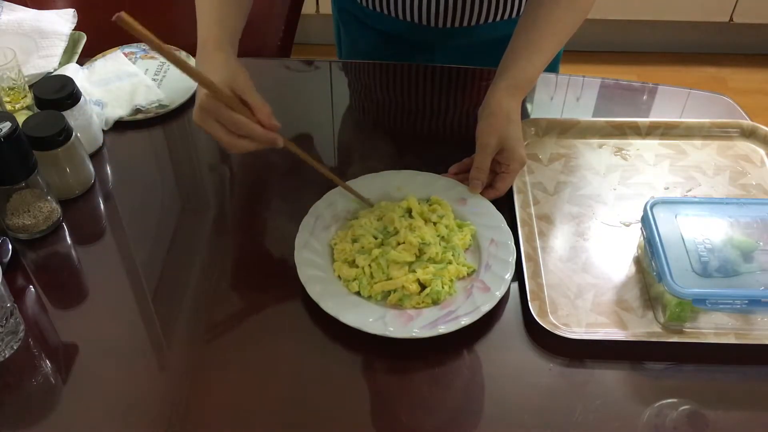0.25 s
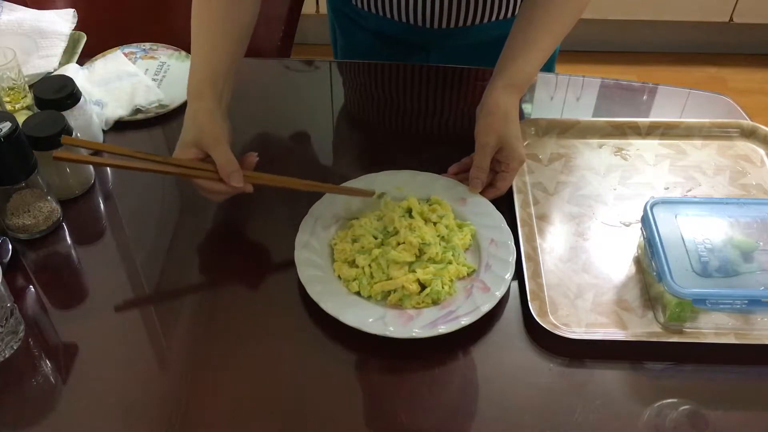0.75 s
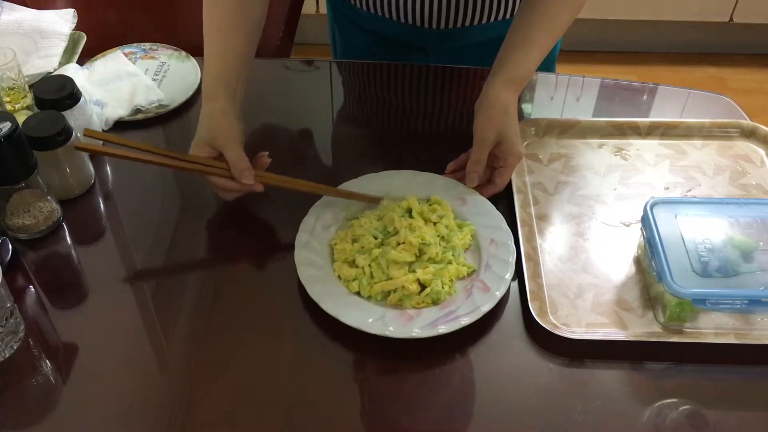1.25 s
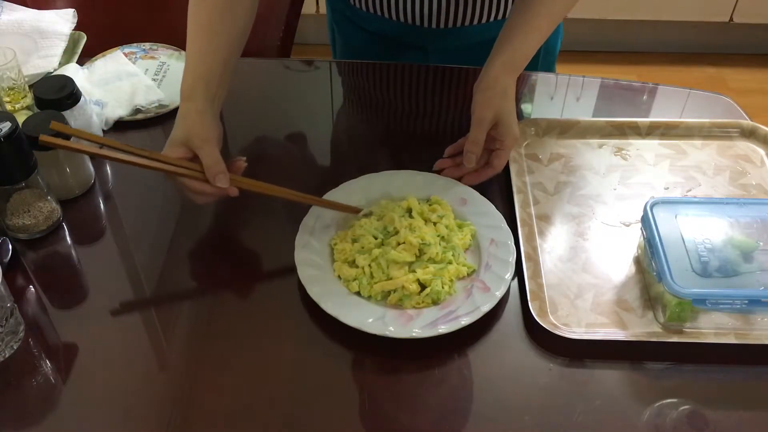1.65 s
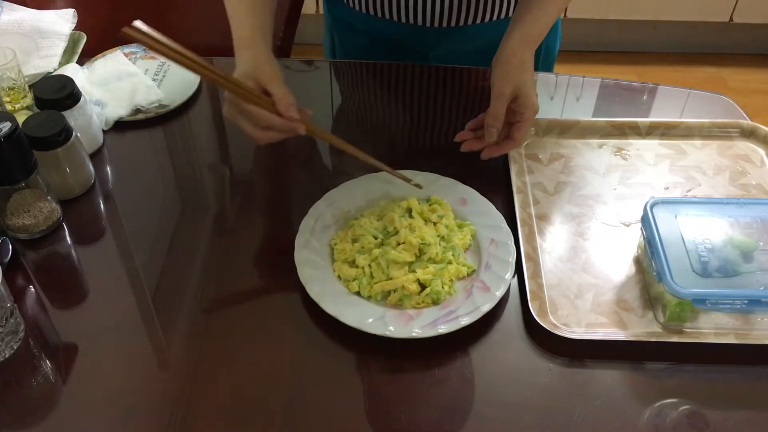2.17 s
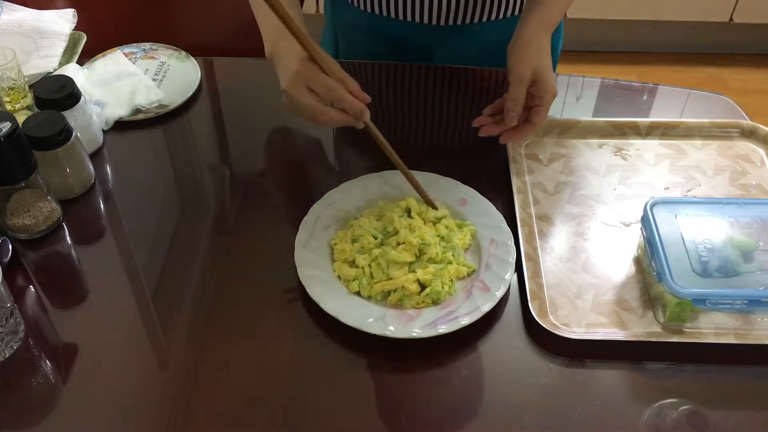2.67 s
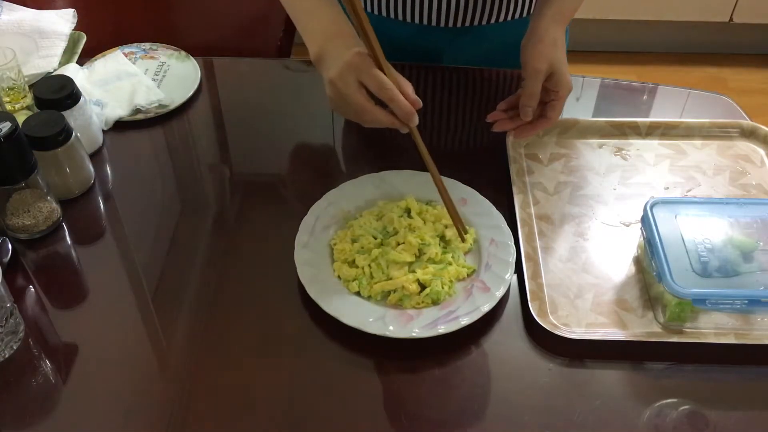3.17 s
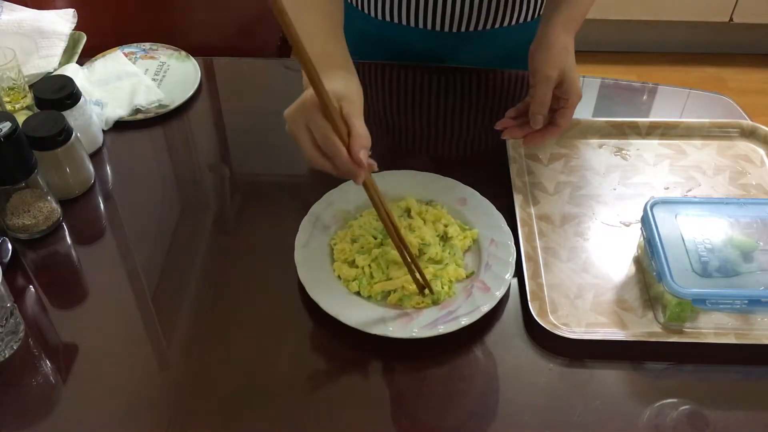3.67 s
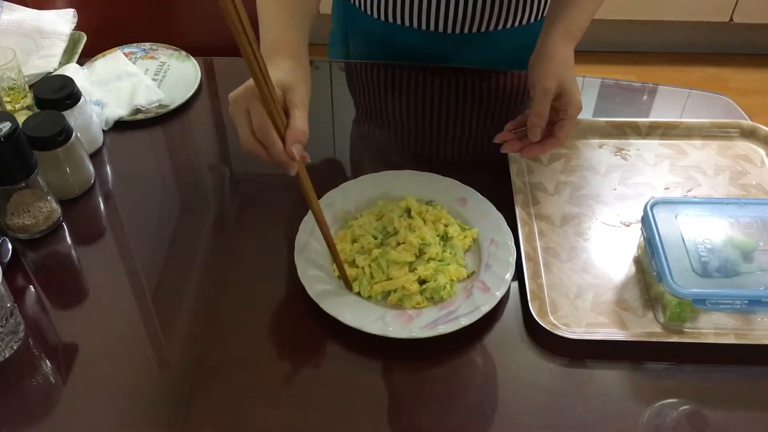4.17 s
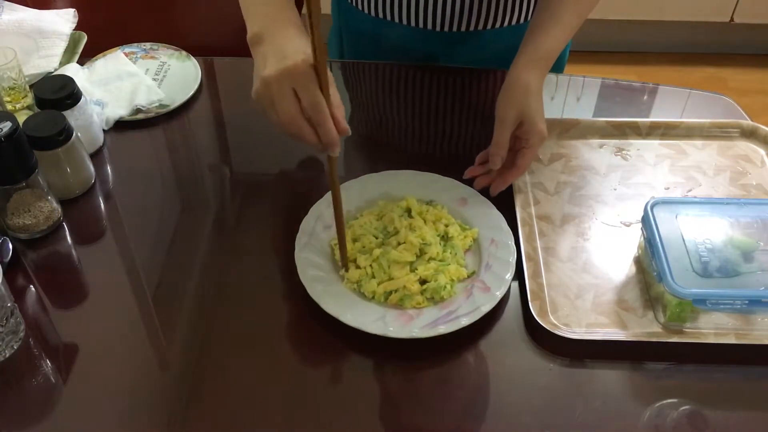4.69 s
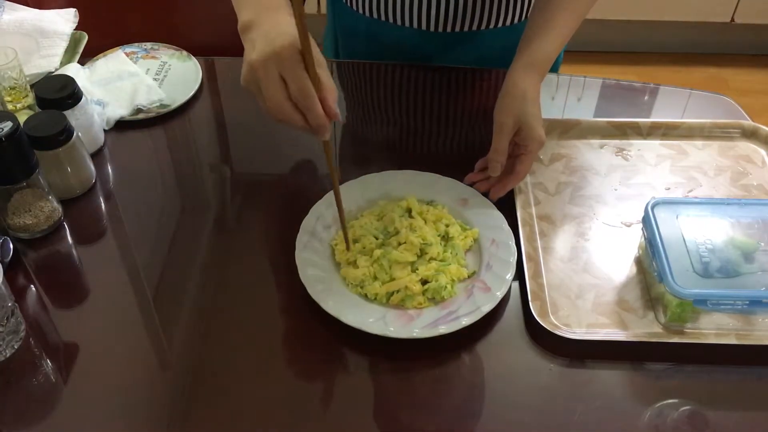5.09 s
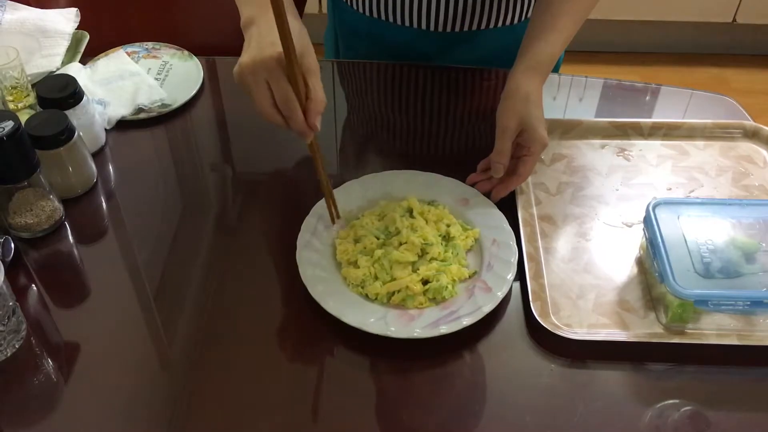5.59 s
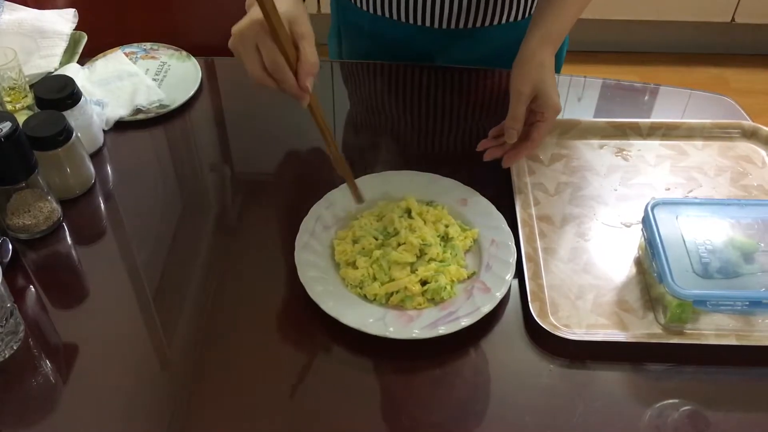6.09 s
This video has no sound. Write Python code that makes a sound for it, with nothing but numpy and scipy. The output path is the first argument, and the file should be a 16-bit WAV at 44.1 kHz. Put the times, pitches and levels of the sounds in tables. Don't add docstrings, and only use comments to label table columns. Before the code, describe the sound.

Wooden chopsticks tap a ceramic plate with sharp, briefly ringing clicks, while moist food ticks softly and a kitchen appliance hums.

```python
import sys
import numpy as np
from scipy import signal
from scipy.fft import rfft, irfft, next_fast_len
from scipy.io import wavfile
from scipy.ndimage import uniform_filter1d, minimum_filter1d

SR = 44100
rng = np.random.default_rng(int(sys.argv[2]) if len(sys.argv) > 2 else 0)


def voltage_ratio(level):
    return 10 ** (np.asarray(level, float) / 20)


def persist_wave(psi):
    counts = np.round(np.clip(psi, -1, 1) * 32767).astype(np.int16)
    wavfile.write(sys.argv[1], SR, np.atleast_2d(counts).T)


N = 279838


def unit(x):
    return x / np.sqrt(np.mean(x ** 2) + 1e-20)


def along(points, hz):
    f, v = np.transpose(points)
    return np.interp(np.log(hz + 1), np.log(f + 1), v)


def noise(response):
    m = next_fast_len(N)
    spectrum = rfft(rng.standard_normal(m)) * response(np.fft.rfftfreq(m, 1 / SR))
    return unit(irfft(spectrum, m)[:N])


# (time [s], strength [dB], hardness [flat of the stick -1 to bare tip 1],
# place [well -1 to rim 1], side [near -1 to far 1])
TAPS = [(0.245, -26, 0.78, -0.78, 0.46), (1.0275, -23, 0.027, -0.45, 0.15),
        (1.2682, -22.5, 0.66, 0.026, -0.51), (1.5474, -33, -0.34, 0.22, 0.31),
        (2.405, -23, 1, -0.49, -0.82), (2.7083, -27.5, -0.2, -0.26, -0.78), (3.0942, -27, -0.9, -.8, 0.18),
        (3.4407, -24.6, -.8, 0.67, -0.25), (3.4542, -28.5, 1.96, -0.051, 0.15),
        (3.4792, -44, 1, 0.24, -0.44), (3.8547, -28, -1.04, -0.72, 0.56), (4.2823, -37, -0.36, -0.4, 0.37),
        (4.648, -17.5, -0.57, 0.77, 0.047), (4.9295, -18, -0.31, 0.91, 0.6),
        (5.3554, -23.5, -0.79, -0.22, 0.18), (5.695, -23.5, -0.37, 0.76, -0.92),
        (5.9995, -23, 0.17, 0.41, -1.87), (6.3224, -42.5, 0.99, -0.94, .1)]


def ducking():
    start_db, threshold_db, duck_per_db = -6, -40, 0.26
    fall_s, hold_s, creep_db_per_s = 0.03, 0.067, 6
    hard_db = 5.2
    t = np.arange(N) / SR
    gain_db = np.minimum(0, start_db + creep_db_per_s * t)
    for s, db, hard, *_ in TAPS:
        depth_db = duck_per_db * (db + hard_db * hard - threshold_db)
        fall = -depth_db * np.clip((t - s) / fall_s, 0, 1)
        creep = creep_db_per_s * np.maximum(0, t - s - hold_s)
        gain_db = np.minimum(gain_db, fall + creep)
    return gain_db


# (frequency [Hz], level [dB per Hz])
HISS = [(530, -27), (900, -3.5), (1030, -4), (1500, -11), (2000, -9.5), (2780, -9.5), (4680, -10),
        (13300, -16), (15200, -23.5), (16300, -27)]
# (frequency [Hz], level [dB per Hz])
HUM = [(24, -22), (40, -7), (109, -14.5), (168, -2), (250, 4), (483, -3.5), (584, -3.5), (637, -4.5),
       (707, -1.5), (798, -8), (2500, -22), (3250, -48), (5500, -120)]
# (frequency [Hz], width [Hz], level [dB per Hz])
DRONE = [(108.2, 1.9, 9.5), (163.7, 20, 4), (183, 4, -9), (252, 3.3, 5.5), (347.3, 10.4, -1.5),
         (526.8, 12, 3), (593, 5.9, 10.5), (692, 9.1, -2)]


def background():
    hiss_db, hum_db = -58, -52.5
    hum_swing = 0.91
    gain_db = ducking()

    def hum_response(f):
        resonances = sum(voltage_ratio(db) * w ** 2 / np.hypot(2 * (f - hz), w) ** 2 for hz, w, db in DRONE)
        return voltage_ratio(along(HUM, f)) + resonances

    hum = noise(hum_response)
    shaft = voltage_ratio(-14) * np.sin(2 * np.pi * 58.5 * np.arange(N) / SR)
    hiss = noise(lambda f: voltage_ratio(along(HISS, f)))
    return voltage_ratio(hiss_db + gain_db) * hiss + voltage_ratio(hum_db + hum_swing * gain_db) * (hum + shaft)


def ring(modes, t, rise):
    hz, db, t60 = np.transpose(modes)[:, :, None]
    size = voltage_ratio(db + rng.standard_normal(hz.shape) - 60 * t / t60)
    return (size * np.sin(2 * np.pi * hz * t)).sum(0) * (1 - np.exp(-t / rise))


# (frequency [Hz], t60 [s])
KITCHEN = [(300, 0.26), (1000, 0.44), (2500, 0.23), (6000, 0.21), (11000, 0.21), (15000, 0.19)]


def room(x, wet_db):
    hz, t, z = signal.stft(rng.standard_normal(SR // 3), SR, nperseg=256)
    decay = voltage_ratio(-60 * t / along(KITCHEN, hz)[:, None])
    tail = signal.istft(z * decay, SR, nperseg=256)[1]
    late = np.arange(len(tail)) > .003 * SR
    tail = voltage_ratio(wet_db) * tail / np.linalg.norm(tail) * late
    tail[0] = 1
    return signal.fftconvolve(x, tail)


def add(out, x, s):
    part = out[round(s * SR):][:len(x)]
    part += x[:len(part)]


# (favoured mode [Hz], gain [dB], muted mode [Hz], loss [dB])
SPOTS = [(1702, 6.5, 2400, 8), (3845, 4, 5100, 3), (4940, 8.5, 2040, 14), (3845, 5.5, 6150, 0),
         (2033, 5, 2780, 1), (2017, 0.5, 6150, 2), (476, 3, 3845, 4.5), (2140, 14, 2660, 5),
         (11500, 3, 2100, 7), (6150, 1, 2770, 12), (725, 4, 1140, 8), (2120, 6, 1770, 14),
         (1140, 1, 1620, 4), (3760, 3, 4940, 6), (2810, 3, 5200, 3), (2032, 13.5, 590, 6),
         (2017, 6.5, 590, 4.5), (2790, 23, 3000, 3)]


def spot(k, hz, reach=.04):
    up_hz, gain_db, down_hz, loss_db = SPOTS[k]

    def near(centre_hz):
        return np.exp(-(np.log2(hz / centre_hz) / reach) ** 2)

    return gain_db * near(up_hz) - loss_db * near(down_hz)


def answer(law):
    _, strength_db, *touch = np.transpose(TAPS)
    law = np.array(law)
    return strength_db[:, None] + law[:, 0] + np.transpose(touch) @ law[:, 1:].T


def taps(law, groups, rise):
    t = np.arange(SR // 4) / SR
    sounds = []
    for k, levels_db in enumerate(answer(law)):
        parts = [voltage_ratio(db + spot(k, g[0][0])) * ring(g, t, rise) for db, g in zip(levels_db, groups)]
        sounds.append(sum(parts))
    return sounds


def thud(db, hz, push_db, t):
    knock_modes = [(hz, 0, .06), (hz * 0.76, -7, .05), (hz * 1.3, -11, .07), (hz * 1.1, -10, .05)]
    knock = ring(knock_modes, t, rise=0.00062)
    push = ring([(136, 1.5, 0.12), (233, 2.5, 0.093), (363, -37, 0.022)], t, rise=0.0051)
    return voltage_ratio(db + 7) * knock + voltage_ratio(push_db - 10.0) * push


# (from time [s], rocking [Hz], stick pitch set by the grip [factor])
ROCK = [(0, 550, 1.02), (.6, 550, 1.1), (2, 476, 0.95), (3.47, 725, 0.98), (4, 600, 1.2)]


def hold(s):
    return [(hz, grip) for since, hz, grip in ROCK if since <= s][-1]


# (frequency [Hz], level [dB], t60 [s])
RING_MODES = [
    [(2751, -1, .22), (2840, -8, .15), (3050, -8, .09)],
    [(1680, 1, .25), (1735, -7, .13)],
    [(2085, -1, .13), (2010, -5, .1), (2245, -8, .12)],
    [(3845, 0, .38), (3780, -8, .2), (3903, -8, .2)],
    [(4955, 1, .19)],
]
EDGE_MODES = [
    [(6153, 0, .22)],
    [(7483, 0, .15), (8942, -4, .14)],
    [(1140, 0, .05), (1050, -8, .09), (1235, -9, .09), (900, -8, .07)],
]
# (frequency [Hz], level [dB], t60 [s])
TOUCH_MODES = [
    [(2008, -3.5, 0.014), (2240, -0.5, 0.007)],
    [(2788, 6.5, 0.023), (3570, -43, 0.055)],
    [(3853, -0.5, 0.032), (4370, -26, 0.0032)],
    [(5053, 1.6, 0.021)],
    [(1737, 4, 0.041)],
]
# (level over strength [dB], hardness [dB per unit], place [dB per unit], side [dB per unit])
RING_LAW = [(-20, -6, 1.8, -0.5), (-28, 2, 6, 4.5), (-36, -16, -1.5, 5), (-37, -3, -4.5, 3.5),
            (-27, -3, -1.5, -3)]
EDGE_LAW = [(-27.5, 8.5, 6, 0), (-38, 13, 11, -1.5), (-13.5, -4.5, 1.7, -0.5)]
TOUCH_LAW = [(-1, -4, -8, -6.6), (-2.5, -3, 5, 4.5), (2.3, -1.5, 4, -3), (-9.5, -6.5, -3.5, -5.5),
             (-8.5, 0.5, 3.5, 3.5)]
THUD_LAW = [
    (-17, -1, 1.5, 1),
    (-17, 0, -8, 0),
]


def plate():
    out, t = np.zeros(N), np.arange(SR // 4) / SR
    low = taps(RING_LAW, RING_MODES, rise=0.0033)
    high = taps(EDGE_LAW, EDGE_MODES, rise=0.00035)
    touch = taps(TOUCH_LAW, TOUCH_MODES, rise=0.0013)
    for k, ((s, *_), (rock_db, push_db)) in enumerate(zip(TAPS, answer(THUD_LAW))):
        rock_hz, _ = hold(s)
        knock = thud(rock_db + spot(k, rock_hz), rock_hz, push_db + spot(k, 136), t)
        add(out, room(touch[k] + knock, wet_db=-13.0), s - .0006)
        add(out, room(low[k] + high[k], wet_db=-11.5), s - .0006)
    return out


CRACK_HZ = [2100, 4200, 7300, 12000]
# (frequency [Hz], width [Hz], level [dB])
STICK = [(2100, 900, 6), (4330, 520, 9), (6330, 800, 9.5), (7780, 700, 11), (10280, 800, 10.5),
         (12000, 800, 11.5)]


def crack(levels_db, t60, grip=1, colour_db=0):
    even = 0.49
    t, f = np.arange(2048) / SR, np.fft.rfftfreq(2048, 1 / SR)
    fade_s = np.where(t < .001, .003, t60)
    burst = rng.standard_normal(len(t)) * voltage_ratio(-60 * np.abs(t - .001) / fade_s)
    burst[44] += 3.5
    shape = [(300, levels_db[0] - 35), (1450, levels_db[0] - 14)]
    shape += list(zip(CRACK_HZ, levels_db))
    shape += [(15700, levels_db[-1] - 5), (17000, -120)]
    modes_db = sum(db / (1 + (2 * (f - grip * hz) / w) ** 2) for hz, w, db in STICK)
    cepstrum = irfft(np.log(voltage_ratio(along(shape, f) + modes_db + colour_db)))
    half = len(t) // 2
    cepstrum *= np.r_[1, np.full(half - 1, 2), 1, np.zeros(half - 1)]
    z = rfft(burst)
    evened = z * (np.linalg.norm(burst) / np.abs(z)) ** even
    return irfft(evened * np.exp(rfft(cepstrum)))[:half]


# (level over strength [dB], hardness [dB per unit], place [dB per unit], side [dB per unit])
CRACK_LAW = [
    (13.5, 6.5, 4.5, 8.5),
    (7, 5.5, 2, 1.6),
    (-2, 9.5, -4, 7),
    (-14.5, 14, -4, 3.5),
]
# (time [s], level [dB], brightest frequency [Hz])
BOUNCE = [(2.4562, -47, 8000), (3.078, -44, 12300), (3.0806, -42, 12500), (3.163, -46.5, 11500),
          (3.5, -37, 9000), (6.3221, -25.5, 6140), (4.7018, -29, 5500), (5.0283, -47, 7300),
          (6.275, -40, 5900)]


def sticks():
    hard_lag_s, bounce_db_per_oct = 0.000996, 22.5
    out, hz = np.zeros(N), np.fft.rfftfreq(2048, 1 / SR) + 1
    for k, ((s, _, hard, *_), crack_db) in enumerate(zip(TAPS, answer(CRACK_LAW))):
        _, grip = hold(s)
        colour_db = 0.4 * spot(k, hz, reach=0.21)
        blow = crack(crack_db, t60=0.014, grip=grip, colour_db=colour_db)
        add(out, voltage_ratio(-7) * room(blow, wet_db=-14), s - .0004 + hard_lag_s * np.clip(hard, 0, 1))
    for s, db, top_hz in BOUNCE:
        octaves = np.abs(np.log2(np.divide(CRACK_HZ, top_hz)))
        rebound = crack(db - bounce_db_per_oct * octaves, t60=0.011)
        add(out, voltage_ratio(-3.0) * room(rebound, wet_db=-6), s - .0004)
    return out


# (time [s], peak [dB], centre [Hz], plate level [dB])
TICKS = [(0.524, -51, 5000, -41), (0.5518, -50, 4910, -40), (0.675, -50, 6210, -38),
         (0.7016, -50, 6780, -68), (0.7625, -41, 7000, -66), (0.79, -51, 4330, -64),
         (0.8114, -54, 4400, -62), (0.9062, -43.5, 4570, -52), (1.3463, -52.5, 1420, -63),
         (1.6342, -47, 7500, -63), (1.7406, -37.5, 6540, -73), (2.033, -49, 1960, -66),
         (2.9051, -36, 6980, -67), (3.245, -49, 5120, -65), (3.2703, -49, 4240, -65),
         (3.4643, -36, 2000, -41), (3.6456, -48.5, 5200, -58), (4.008, -45.5, 4970, -69),
         (4.3597, -49.5, 4940, -46), (4.3904, -51, 4420, -42), (5.1926, -49, 4300, -60),
         (5.5696, -45.5, 4500, -60), (6.076, -54, 4900, -36), (6.2418, -46.5, 4400, -44),
         (4.624, -42, 4960, -60), (3.0735, -33, 7140, -60), (5.444, -51, 6300, -62), (5.62, -55, 3300, -52)]


def food():
    out, t = np.zeros(N), np.arange(SR // 30) / SR
    for s, db, hz, plate_db in TICKS:
        t60 = 15 / hz
        modes = [(hz, 0, t60), (hz * 0.44, -9, t60 / 2), (hz * 1.55, -5, t60 / 2), (hz * 0.9, -10, t60 / 2)]
        click = voltage_ratio(db + 7) * ring(modes, t, rise=0.000067)
        click += voltage_ratio(plate_db - 10) * ring([(3760, 0, 0.016)], t, rise=0.00027)
        add(out, room(click, wet_db=-11), s + .0003)
    return out


def scene():
    return (background() + plate() + sticks() + food())[None]


def top_cut(x):
    return signal.sosfilt(signal.butter(12, 16480, fs=SR, output="sos"), x)


def record(dry):
    need = np.minimum(1, .23 / (np.abs(dry) + 1e-9))
    held = dry * uniform_filter1d(minimum_filter1d(need, size=129), size=65)
    passband = np.fft.rfftfreq(N, 1 / SR) < 16400
    mix = irfft(rfft(held) * passband, N)
    return top_cut(mix)


dry = scene()
out = record(dry)
persist_wave(out)
```